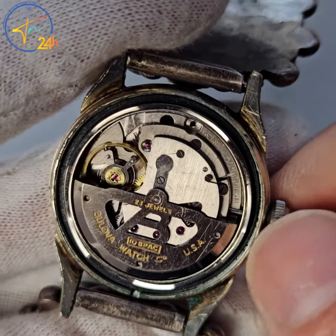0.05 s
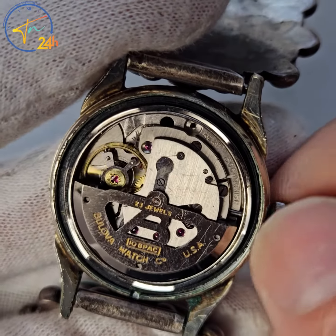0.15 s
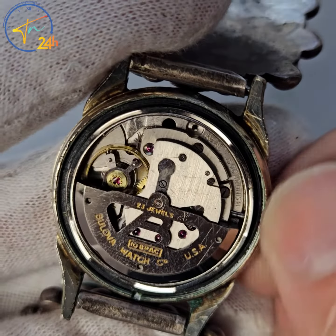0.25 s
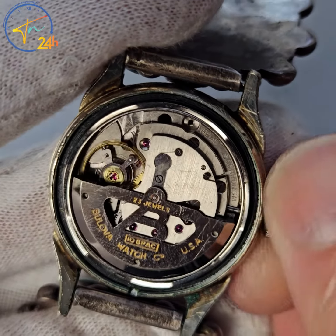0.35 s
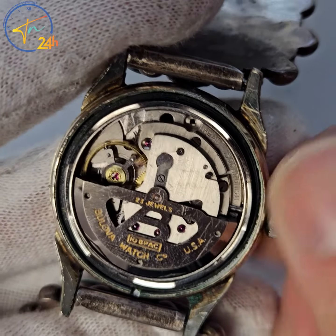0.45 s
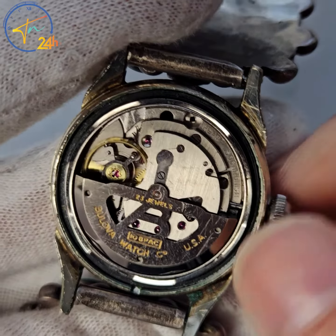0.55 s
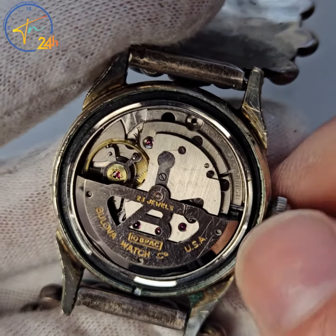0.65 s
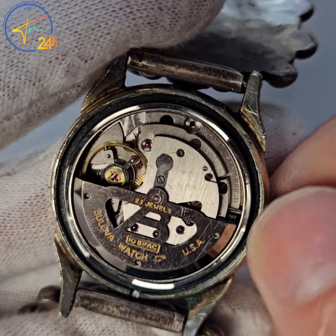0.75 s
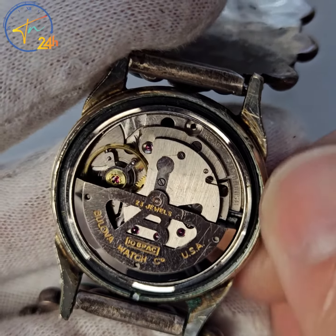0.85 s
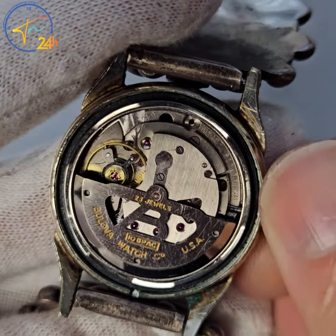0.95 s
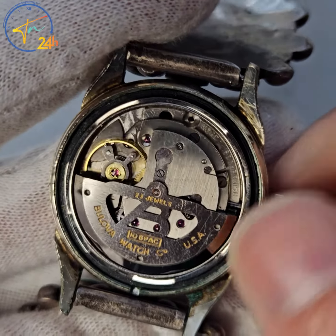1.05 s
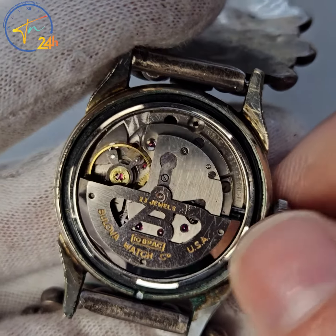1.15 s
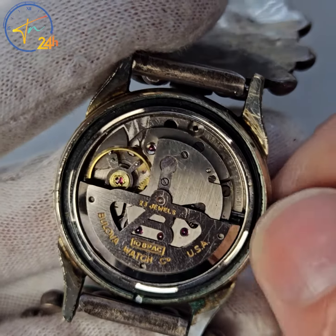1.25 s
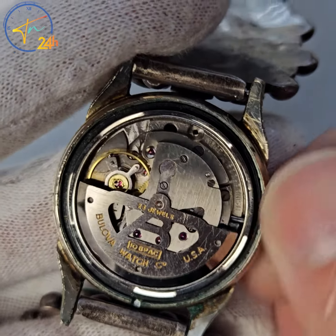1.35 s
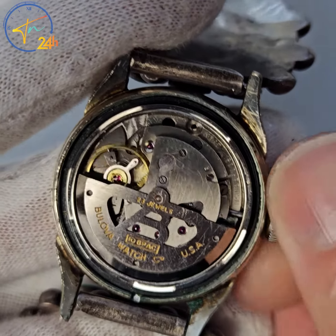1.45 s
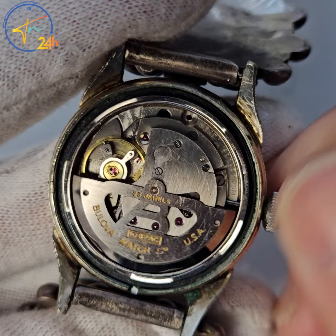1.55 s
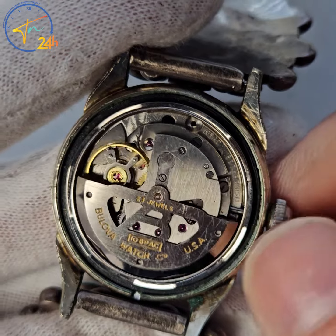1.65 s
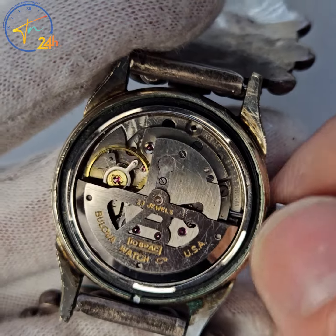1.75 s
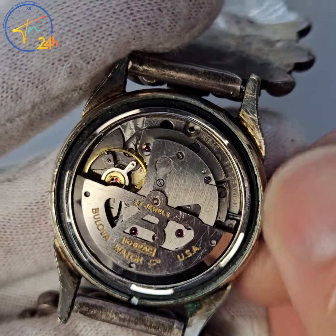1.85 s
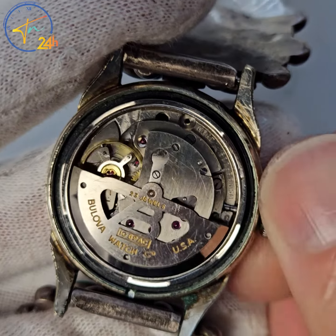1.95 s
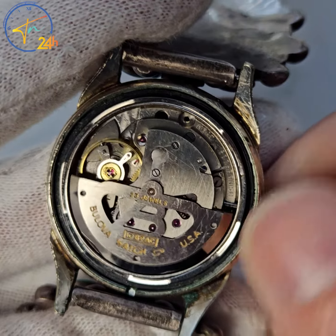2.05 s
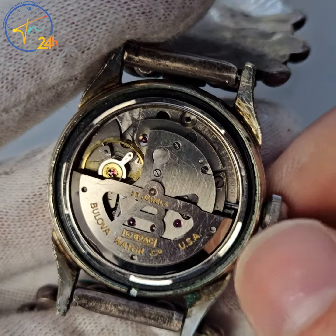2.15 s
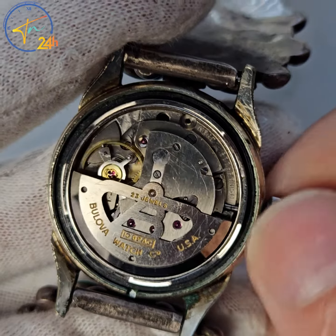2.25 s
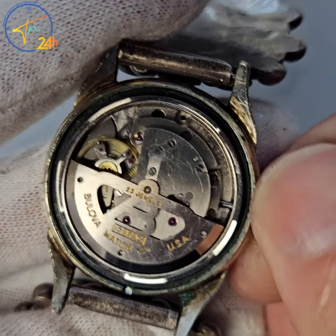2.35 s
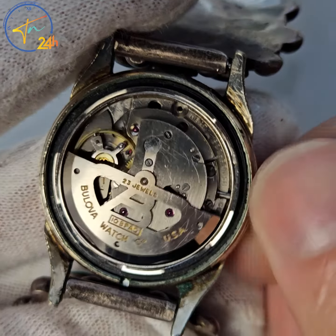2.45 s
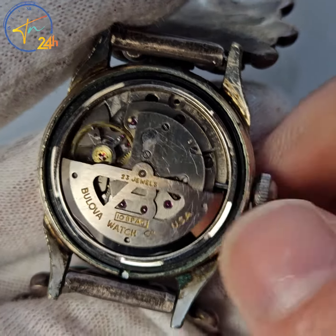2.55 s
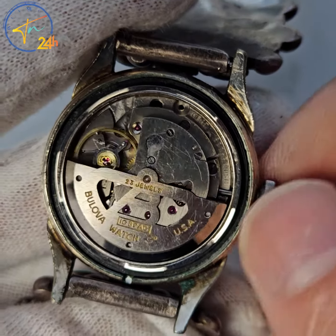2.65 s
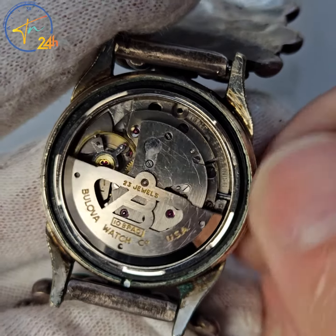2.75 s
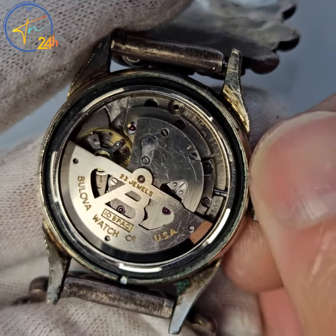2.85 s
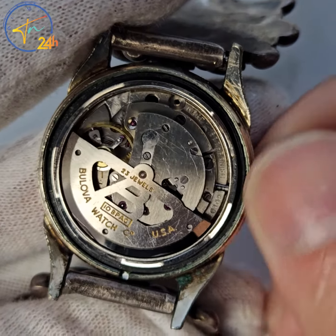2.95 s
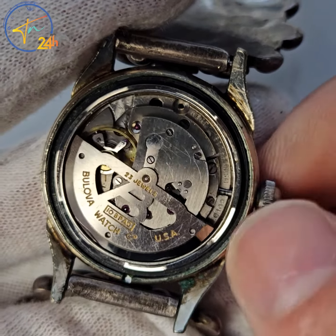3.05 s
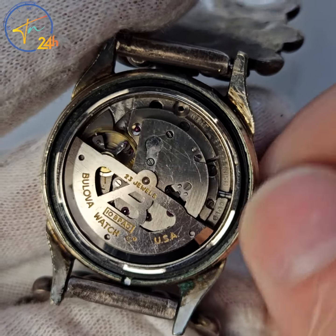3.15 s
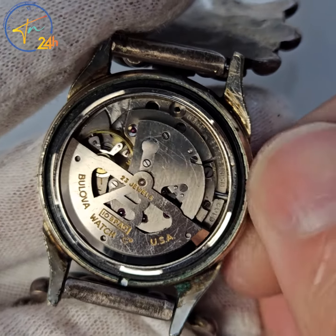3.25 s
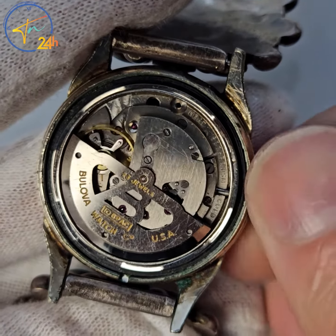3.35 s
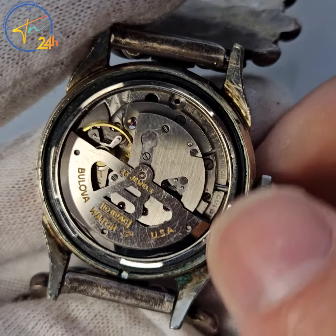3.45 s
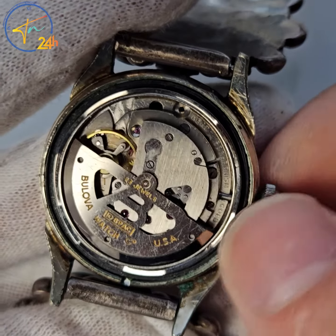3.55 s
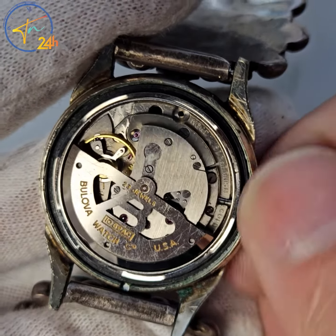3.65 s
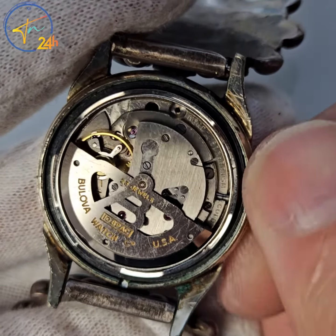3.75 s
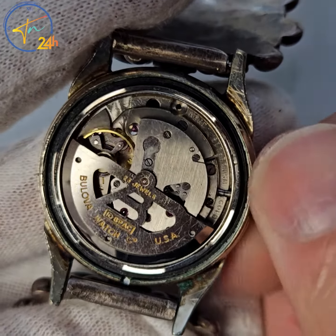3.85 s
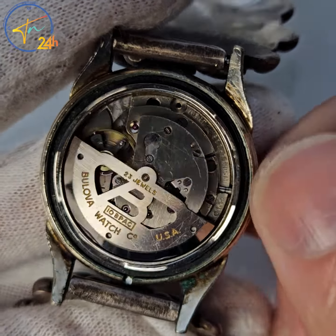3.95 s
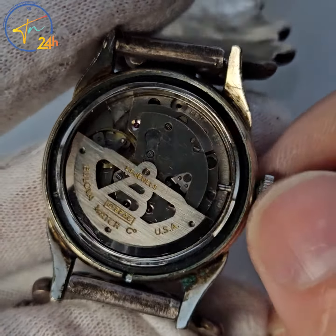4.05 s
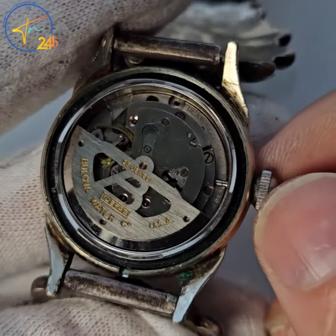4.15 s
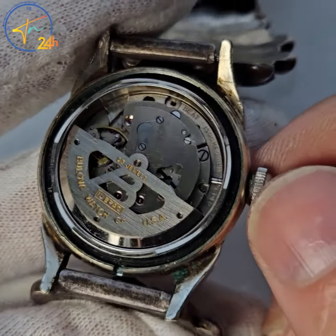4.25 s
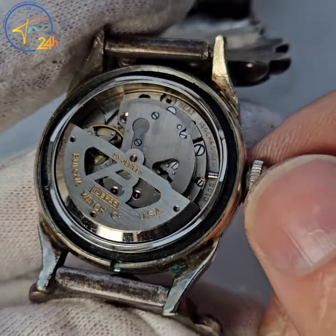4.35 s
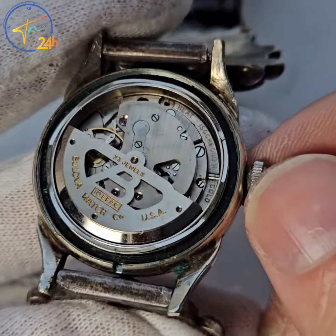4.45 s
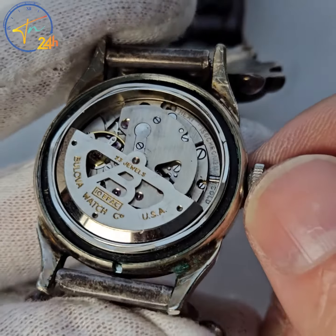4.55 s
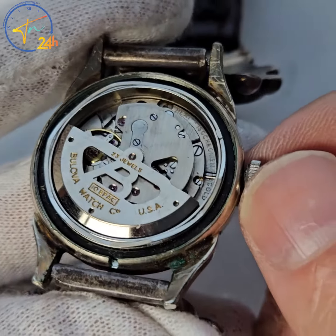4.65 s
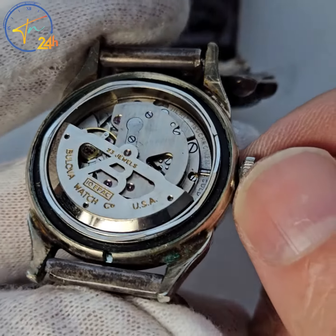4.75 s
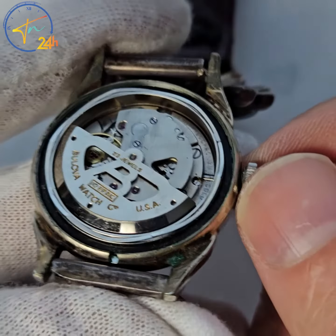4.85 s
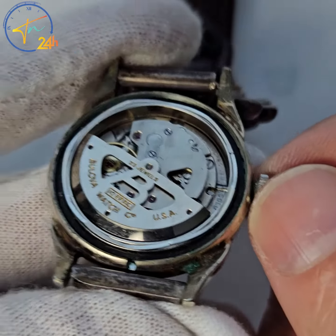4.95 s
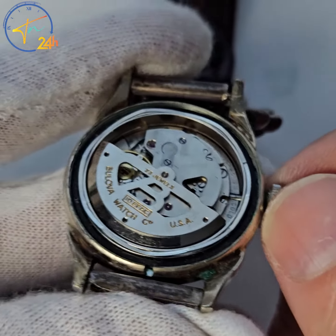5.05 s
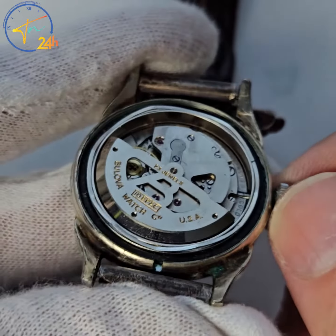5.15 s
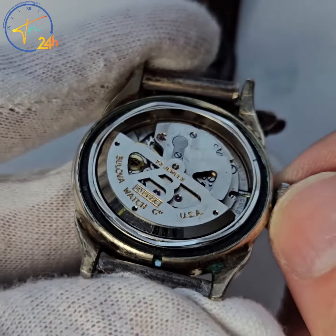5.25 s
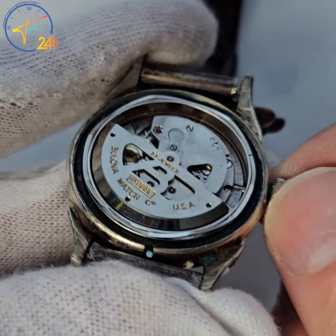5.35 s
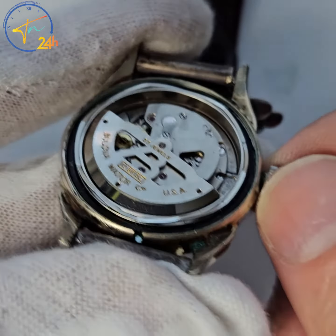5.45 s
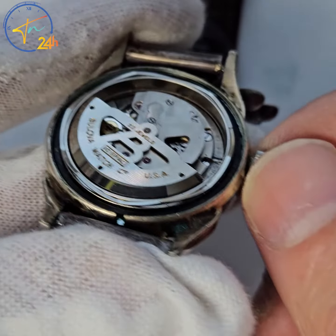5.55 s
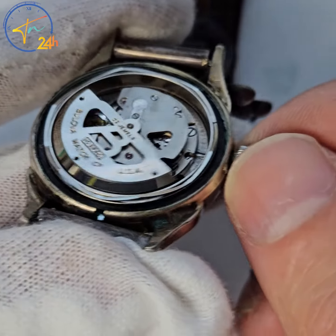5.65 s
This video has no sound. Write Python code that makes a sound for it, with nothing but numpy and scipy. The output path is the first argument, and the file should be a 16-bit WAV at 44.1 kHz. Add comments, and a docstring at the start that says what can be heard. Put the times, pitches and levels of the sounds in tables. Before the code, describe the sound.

Very close stereo sound of a wristwatch being wound in a small room. A tiny steel clack at 0.02 s opens, then a fine, bright gear rasp runs from 0.1 to 0.32 s, accelerating into a thin buzzing whine and slowing. Seven more flicks follow, starting near 0.7, 1.2, 1.7, 2.2, 2.65, 3.1 and 3.6 s, each 0.15 to 0.2 s long, gradually higher in pitch. Sharp light clacks precede most flicks, strongest around 2.2 s; small ticks and soft brushes fall between, with a clear bright tick at 2.42 s. The last rasp ends by 3.75 s. Small metallic fitting knocks come around 3.95 to 4.13 s, the clearest at 4.12. Then it is almost quiet until 5.7 s: barely audible ticking ten times a second, faint knocks, muffled low bumps near 4.7, 4.9 and 5.35 s, over soft low rumble and faint hiss.

```python
"""A wristwatch is wound by its crown in eight quick flicks, close to a stereo microphone in a small room.
Clacks sound as the stem takes up its play: damped modes of the stem ring with bursts of noise.
In each flick the gears rasp, noise pulsed tooth by tooth, and sing harmonics of the tooth rate where fastest.
Light ticks, knocks and brushes are noise bursts and resonances as the fingers let go and shift.
The movement ticks faintly, and a low rumble of filtered noise lies behind with a faint hiss."""
import sys
import numpy as np
from scipy import signal
from scipy.fft import rfft, irfft, next_fast_len
from scipy.io import wavfile
from scipy.ndimage import uniform_filter1d, map_coordinates

SR = 44100
rng = np.random.default_rng(int(sys.argv[2]) if len(sys.argv) > 2 else 0)


def store_pcm(level_fs):
    """Save levels as 16-bit WAV."""
    pcm = np.round(np.clip(level_fs, -1, 1) * 32767).astype(np.int16)
    wavfile.write(sys.argv[1], SR, np.atleast_2d(pcm).T)


N = 251811
TIME = np.arange(N) / SR

# Spectrum of light steel contact. Each row: frequency in hertz, relative density in dB per hertz.
CONTACT_COLOUR = [(900, -33.5), (2100, 5), (3500, 6.5), (4500, -13.5), (5500, -1.5), (6900, 0.5), (9000, 5),
                  (13000, 12.5), (16000, 3.5)]
# The watch as the two microphone ports hear it. Each row: frequency in hertz, left-right level in dB,
# left phase lead in radians, likeness (coherence) of the ports from 0 to 1.
PORTS = [(1000, 0, .5, .3), (1450, 5, 1, .6), (2050, 6, 1.9, .8), (2400, 3, 2.2, .88), (2580, 0, 2.85, .98),
         (2700, 0, 3.14, .999), (2920, 0, 3.22, .997), (3270, 4.5, 3.95, .75), (3600, 0, 3.2, .94),
         (4000, -2, 3.9, .85), (4300, 0, 5.9, .8), (4700, 6, 5.4, .8), (5000, 4, 5.25, .75),
         (5200, -1, 6.3, .75), (5550, 4, 7.7, .7), (5900, 9, 6.3, .6), (7500, 10, 8, .25), (8100, 9, 6, .4),
         (8400, 0, 6.3, .85), (9500, 2, 8, .4), (10500, 6, 9.9, .55), (11400, 4, 10.3, .4),
         (11900, -1, 10.9, .6), (12500, 2, 11.7, .7), (13700, 3, 12.6, .3), (15500, 2, 12.9, .35)]


def amp(db):
    """Logarithmic level: decibels become an amplitude gain."""
    return 10 ** (np.asarray(db) / 20)


def unit(x):
    """Mean power: x is scaled to rms 1."""
    return x / np.sqrt(np.mean(x ** 2) + 1e-20)


def along(points, hz, axis=1):
    """Logarithmic pitch: one column of a table is interpolated over log frequency."""
    table = np.transpose(points)
    return np.interp(np.log(hz + 1), np.log(table[0] + 1), table[axis])


def wobble(rate):
    """Random modulation: a smooth curve through random knots, rate of them a second."""
    knots = rng.standard_normal(int(N * rate / SR) + 4)
    return map_coordinates(knots, [TIME * rate])


def filtered(x, response):
    """Linear filtering: the spectrum of x is multiplied by a complex response of frequency."""
    size = next_fast_len(x.shape[-1] + 8192)
    hz = np.fft.rfftfreq(size, 1 / SR)
    return irfft(rfft(x, size) * response(hz), size)[..., :x.shape[-1]]


def coloured(x, spectrum):
    """Spectral shaping: x takes on a tabled spectrum, at rms 1."""
    return unit(filtered(x, lambda hz: amp(along(spectrum, hz))))


def shelved(x, treble_db):
    """Shelving filter: the range above about 7 kHz is raised or lowered, at rms 1."""
    return unit(filtered(x, lambda hz: amp(treble_db / (1 + (7000 / (hz + 1)) ** 6))))


def resonance(hz, centre_hz, width_hz):
    """Damped resonance: the response of one mode, 1 at its centre."""
    return 1j * hz * width_hz / (centre_hz ** 2 - hz ** 2 + 1j * hz * width_hz)


def causal(gain):
    """Minimum phase: the cepstrum is folded so a response rings only after its cause, at mean power 1."""
    cepstrum = irfft(np.log(unit(gain)))
    half = len(cepstrum) // 2
    fold = np.r_[1, np.full(half - 1, 2), 1, np.zeros(half - 1)]
    return np.exp(rfft(cepstrum * fold))


def shifting(x, depth_db, width_hz, hold_s):
    """Time-varying filtering: narrow peaks and hollows drift at random through x."""
    hz, t, z = signal.stft(x, SR, nperseg=512)
    grid = np.meshgrid(hz / width_hz, t / hold_s, indexing="ij")
    field = map_coordinates(rng.standard_normal(z.shape[1:]), grid)
    return signal.istft(z * unit(amp(depth_db * field)), SR, nperseg=512)[1][:, :N]


def panned(x, db):
    """Level stereo: the left is made louder than the right by db."""
    return x * amp([[db / 2], [-db / 2]])


def spread(pair):
    """Partial coherence: two unrelated signals become a partly alike left and right."""
    def mixing(hz):
        turn = np.arccos(np.clip(along(PORTS, hz, axis=3), 0, 1)) / 2
        return np.array([np.cos(turn), np.sin(turn)])
    shared, apart = filtered(pair, mixing)
    return np.array([shared + apart, shared - apart])


def add(track, s, sound):
    """Superposition: a short sound joins a track at s seconds, or at zero if s is negative."""
    part = track[..., max(round(s * SR), 0):][..., :sound.shape[-1]]
    part += sound[..., :part.shape[-1]]


def low_noise(spectrum, apart_db, steadiness):
    """Mid-side noise: a shared part with its slow swells partly evened out, and a weaker opposed part."""
    mid, side = coloured(rng.standard_normal((2, N)), spectrum)
    swell = abs(uniform_filter1d(mid ** 2, size=SR // 12)) + 1e-6
    mid = unit(mid / swell ** (steadiness / 2))
    side = amp(apart_db) * side
    return np.array([mid + side, mid - side])


def rumble_levels():
    """Addition of powers: each bump of the hands swells over the steady level of the three low bands."""
    # Steady level. Each row: time in seconds, thudding in dB, drone in dB, body in dB.
    steady_rows = [(0, -89.5, -64.5, -63), (0.26, -76, -65, -65), (0.34, -79, -55.5, -67),
                   (1.7, -66, -58.5, -61.5), (2.202, -74.5, -60, -64), (2.55, -71, -69, -67.5),
                   (3.149, -64.5, -64, -59), (3.65, -73.5, -65, -64.5), (3.999, -78, -65, -59.5),
                   (4.25, -67, -57, -64.5), (5.7, -65, -60, -62.5)]
    # Hands take hold and let go. Each row: time in seconds, swell length (centre to 1/e) in seconds,
    # thudding in dB, drone in dB.
    bumps = [(0.38, 0.034, -88, -51), (1.052, 0.073, -84, -54), (1.362, 0.03, -59.5, -59),
             (1.824, 0.043, -62.5, -53), (2.374, 0.052, -84.5, -52), (2.664, 0.058, -60, -54.5),
             (2.837, 0.077, -62, -53), (2.918, 0.017, -58, -67), (3.092, 0.054, -72.5, -46),
             (3.249, 0.036, -56, -49), (3.316, 0.031, -55.5, -59), (3.515, 0.047, -62, -50),
             (3.769, 0.034, -57.5, -52.5), (3.866, 0.018, -58.5, -52), (4.669, 0.041, -53, -68),
             (4.901, 0.033, -54, -60.5), (5.35, 0.023, -49, -53.5)]
    body_share_db = -14  # a bump in the body band, against the drone
    s, *columns = np.transpose(steady_rows)
    steady = amp([np.interp(TIME, s, column) for column in columns])
    swells = 0
    for at, length, thud_db, drone_db in bumps:
        bump = np.exp(-((TIME - at) / length) ** 2)
        swells = swells + amp([[thud_db], [drone_db], [drone_db + body_share_db]]) * bump
    return np.hypot(steady, swells)


def background():
    """Band-limited noise: soft thudding, a wavering drone and a dull rush, with faint hiss."""
    # Spectra of the four layers. Each row: frequency in hertz, relative density in dB per hertz.
    thud_colour = [(20, -31), (40, -20.5), (58, -2), (75, 1.5), (92, 3), (115, -22), (200, -82.5)]
    drone_colour = [(70, -51.5), (102, -5.5), (123, 14.5), (140, 8.5), (170, -1), (230, -55)]
    body_colour = [(120, -19.5), (180, 0), (218, 1.5), (260, -2), (310, -1), (400, -11.5), (500, -22),
                   (640, -31), (1000, -43.5), (2000, -56)]
    hiss_colour = [(500, -2), (750, 6), (950, -0.5), (1200, 5), (1600, -5.5), (2100, -0.5), (2500, -5.5),
                   (4500, -6), (6000, -13), (10000, -14.5), (12500, -17.5), (13500, -29.5), (16000, -45)]
    thud_gain, drone_gain, body_gain = rumble_levels()
    thud = thud_gain * panned(low_noise(thud_colour, apart_db=-21.5, steadiness=0.79), -9.0)
    drone = panned(low_noise(drone_colour, apart_db=-18.0, steadiness=0.16), -3.5)
    drone = drone_gain * amp(2.2 * wobble(21)) * drone
    body = body_gain * panned(low_noise(body_colour, apart_db=-7.5, steadiness=0.13), -0.76)
    hiss = coloured(rng.standard_normal((2, N)), hiss_colour)
    hiss = amp(-84.5) * shifting(hiss, depth_db=3, width_hz=70, hold_s=.09)
    return thud + drone + body + hiss


def clacks(crack_t60=0.0016, chatter_db=-26, chatter_s=0.0083, chatter_grows=0.16,
           lead_in_db=-31, lead_in_s=0.0066):
    """Impact excitation: a faint swell of noise leads into each strike, which rings modes and chatters; the
    first strike's swell, moved to zero, peaks just after it."""
    # The stem takes up its play. Each row: time in seconds, relative level in dB, overtones in dB.
    strikes = [(0.022, -24, -6.5), (0.659, -25.5, -7.5), (1.081, -30.5, -27.5), (1.183, -30, -13.5),
               (1.699, -26.5, -19), (2.0833, -31, -34), (2.1972, -20.5, -16), (2.2035, -27.5, -16.5),
               (2.6418, -23, -8), (3.0941, -23.5, -6.5), (3.5511, -22.5, -12.5)]
    # Nominal modes of the stem in the case. Each row: frequency in hertz, level in dB, 60 dB decay in seconds.
    stem_modes = [(2250, 0, .011), (2560, -1, .008), (3080, -5, .006), (3850, -9, .005), (4520, -5, .012),
                  (4850, -10, .009), (5650, -13, .005), (7400, -20, .005), (10200, -15, .004),
                  (12600, -8, .003)]
    pan_db = 4.5
    out, t = np.zeros((2, N)), np.arange(SR // 20) / SR
    for s, db, overtone_db in strikes:
        snap_db = 2 + 0.42 * overtone_db  # a harder clack has more snap, in step with its overtones
        # every strike excites the modes a little differently
        modes = np.array(stem_modes) * rng.normal(1, [.02, .15, .15], (len(stem_modes), 3))
        rings = []
        for k, (hz, level, t60) in enumerate(modes):
            decay = amp(level + rng.normal(0, 2) - 60 * t / t60)
            rings.append((-1) ** k * decay * np.sin(2 * np.pi * hz * t))
        # a soft contact rings mainly the lowest pair of modes
        ring = sum(rings[:2]) + amp(overtone_db + 10.5) * sum(rings[2:])
        crack, chatter, lead_in = coloured(rng.standard_normal((3, 2, len(t))), CONTACT_COLOUR)
        lead_in = shelved(lead_in, snap_db - 16.5) * np.exp(-t[::-1] / lead_in_s)  # grows to its end
        add(out, s - t[-1], amp(db + lead_in_db) * panned(lead_in, pan_db))
        crack = amp(snap_db) * crack * amp(-60 * t / crack_t60)
        add(out, s, amp(db - 8.5) * panned(ring + crack, pan_db))
        chatter = shelved(chatter, snap_db - 15) * np.exp(-t / chatter_s)
        add(out, s, amp(db + chatter_db + chatter_grows * overtone_db) * panned(chatter, pan_db))
    # so small a body radiates no bass
    return signal.sosfilt(signal.butter(5, 1700, "high", fs=SR, output="sos"), out)


def escapement(first_s=0.068, tick_db=-71.5):
    """Periodic impulses: the running movement ticks softly, strong and weak beats in turn, at uneven levels."""
    # Spectrum of a beat. Each row: frequency in hertz, relative density in dB per hertz.
    beat_colour = [(2500, -26), (4400, -12), (6000, -14), (7300, -5), (8300, -10), (9700, 2), (10800, -10),
                   (12200, -6), (13500, -26)]
    beats = 10 * (TIME - first_s)  # ten beats a second
    age = beats % 1 / 10  # seconds since the last beat
    accent_db = 3.5 * (np.floor(beats) % 2) - 1 + 2.5 * wobble(10)
    strike = amp(accent_db - 60 * age / .075) * (1 - np.exp(-age / .007)) ** 2
    return amp(tick_db) * strike * panned(coloured(rng.standard_normal((2, N)), beat_colour), 4.1)


def snags():
    """Stick and slip: single teeth catch and snap free, each a sudden force that dies away."""
    # Mostly as a flick starts or ends. Each row: time in seconds, force in dB.
    catches = [(0.0841, -38.5), (0.0887, -39), (0.2934, -35), (0.3154, -45), (0.696, -36.5),
               (1.2161, -37.5), (1.731, -38.5), (1.8714, -36), (1.8874, -41.5), (2.8095, -34.5),
               (3.2164, -35.5), (3.2485, -32.5), (3.7164, -31.5)]
    out, t = np.zeros(N), np.arange(SR // 100) / SR
    for s, db in catches:
        add(out, s, amp(db) * np.exp(-t / .0008))
    return out


def crown_motion():
    """Kinematics of a flick: it speeds up, peaks and slows, setting tooth rate, singing and loudness."""
    # Flicks of the crown. Each row: start, fastest moment and end in seconds, relative level in dB,
    # top tooth rate in hertz, speeding up and slowing down in seconds, relative singing in dB, drag from 0 to 1.
    flicks = [(0.095, 0.209, 0.318, -34.5, 2027, 0.052, 0.065, -7, 0.27),
              (0.686, 0.81, 0.87, -34, 2495, 0.055, 0.046, -4, 0.2),
              (1.217, 1.337, 1.39, -33.5, 2608, 0.056, 0.039, -3, 0.07),
              (1.731, 1.812, 1.884, -34, 2746, 0.05, 0.046, -3.5, 0.02),
              (2.217, 2.281, 2.365, -33.5, 2682, 0.042, 0.043, -2, 0.01),
              (2.653, 2.731, 2.816, -33, 2689, .06, .037, -2.5, 0.12),
              (3.114, 3.174, 3.258, -33, 3000, 0.044, 0.044, -6, 0.1),
              (3.571, 3.617, 3.744, -33.5, 3160, 0.027, 0.03, -9.5, 0.45)]
    grip_s, release_s = .008, .0045  # the fingers take hold of the crown; the wheels stop
    ease_db_per_s = 10  # finger pressure eases off through a flick
    drag_speed = .25  # share of top speed that a fully dragging finger keeps up
    rows = np.array(flicks)
    nearest = np.argmin(abs(TIME[:, None] - rows[:, 1]), axis=1)
    start, fastest, end, db, top_hz, rise, fall, sing_db, drag = rows[nearest].T
    late = TIME - fastest
    speed = 1 / (1 + (late / np.where(late < 0, rise, fall)) ** 2)
    held = np.clip(.5 + (TIME - start) / grip_s, 0, 1)
    held = held * np.exp(-np.maximum(TIME - end, 0) / release_s)
    # loudness follows speed, over a share of drag that rasps at any speed
    level = amp(db - ease_db_per_s * late) * held * (drag + (1 - drag) * speed)
    rate_hz = top_hz * (speed + drag_speed * drag * (1 - speed))
    return rate_hz, speed, sing_db, level


def tooth_count(rate_hz, jitter):
    """Phase as the integral of frequency: teeth passed so far, their uneven spacing wavering the rate."""
    uneven = 1 + jitter * wobble(900) + 0.0083 * wobble(110)
    return np.cumsum(abs(rate_hz * uneven)) / SR


def ratchet(passed, rate_hz, scatter_db, rub_db):
    """Pulsed contact force near rms 1: decaying tooth bursts, separate when slow and merging when fast."""
    tooth = passed.astype(int)
    size = amp(scatter_db * rng.standard_normal(N))[tooth]
    since_s = (passed - tooth) / rate_hz
    force = size * np.exp(-since_s / .00045) + amp(rub_db)
    return force / np.sqrt(abs(uniform_filter1d(force ** 2, size=SR // 80)))


def rasp(force):
    """Friction noise: each push scrapes steel on steel and sounds through the case."""
    # Gears heard through the open case. Each row: frequency in hertz, relative density in dB per hertz.
    case_colour = [(900, -40.5), (1400, -29.5), (1750, -23), (2050, -7.5), (2400, -3.5), (2700, -7),
                   (3000, 0), (3250, 2), (3520, -6), (3800, -0.5), (4150, 4.5), (4550, -3), (4950, 0),
                   (5400, -1.5), (6100, 0.5), (6500, -12), (6850, -18.5), (7350, -7), (8500, -5),
                   (8850, -6), (10200, -2.5), (11300, -4), (11800, 3), (12200, 1), (13000, 3),
                   (13450, -1.5), (14300, 2.5), (15000, 1.5), (15600, -1)]
    scrape = spread(force * rng.standard_normal((2, N)))
    return filtered(scrape, lambda hz: causal(amp(along(case_colour, hz))))


def teeth(passed, flutter_db, count=4):
    """Harmonic series: meshing teeth sing the multiples of their rate, each fluttering in level."""
    # Response to the singing teeth. Each row: frequency in hertz, gain in dB.
    sing_colour = [(900, -42), (1300, -30), (1600, -13), (2000, 0), (2400, 4), (3000, 6), (3500, -1),
                   (3900, 6), (4250, 6), (4550, 4), (5000, 7), (5400, 6.5), (6100, -1), (6800, -18),
                   (7500, -6), (8500, -7), (15000, -20)]
    tone = sum(amp(flutter_db * wobble(500)) * np.sin(2 * np.pi * k * passed) for k in range(1, count + 1))
    return filtered(unit(tone), lambda hz: amp(along(sing_colour, hz)))


def plates(x):
    """Sympathetic resonance: the plates and case ring on briefly at their own frequencies."""
    # Sharp resonances. Each row: frequency in hertz, width in hertz, boost in dB.
    plate_modes = [(2395, 45, 3), (4210, 60, 2), (4350, 50, 4), (5060, 70, 2), (5235, 70, 4), (5680, 50, 3),
                   (12600, 100, 3), (13055, 50, 4), (14333, 40, 6)]

    def response(hz):
        return 1 + sum((amp(db) - 1) * resonance(hz, mode, width) for mode, width, db in plate_modes)
    return filtered(x, response)


def winding():
    """Gear meshing: the train rasps tooth by tooth through a flick and sings where it runs fastest."""
    rate_hz, speed, sing_db, level = crown_motion()
    passed = tooth_count(rate_hz, jitter=.032)
    # the wheels bind and run free at random
    push = amp(0.3) * speed ** .13 * level * amp(0.7 * wobble(130))
    force = push * ratchet(passed, rate_hz, scatter_db=2, rub_db=-14)
    song = push * amp(sing_db - 3) * speed ** .6 * teeth(passed, flutter_db=4.5)
    # narrow peaks and hollows drift at random through the rasp and singing
    return plates(shifting(rasp(force + snags()) + song, depth_db=2, width_hz=130, hold_s=.1))


def ticks(t60=0.0081, ring_t60=0.0214, ring_db=-2, width_hz=450):
    """Burst and resonance: small steel parts touch, dull or bright, each with its own short rough ring."""
    # Parts settle, fingers touch the crown. Each row: time in seconds, relative level in dB,
    # ring frequency in hertz, relative treble in dB.
    touches = [(0.369, -42, 4160, 2.5), (0.412, -48, 5350, 1.5), (0.877, -41, 4250, -11.5),
               (0.936, -41, 5120, -4), (1.44, -42, 2300, -20), (1.448, -36, 4300, -11),
               (1.4647, -39.5, 4350, -26), (1.475, -41.5, 2275, -24), (1.4895, -40.5, 4260, -4.5),
               (1.938, -43.5, 5070, -2.5), (1.9639, -51.5, 2380, -24), (2.191, -41.5, 2400, -19),
               (2.419, -29, 5000, 3.5), (2.466, -35, 5160, -9), (2.492, -47.5, 3100, -18.5),
               (2.624, -41, 9850, -2.5), (3.0819, -45, 4490, -1), (3.321, -50.5, 4270, -15),
               (3.363, -53, 4360, -7), (3.5424, -38, 2240, -8.5), (3.81, -47, 4180, -12),
               (3.8435, -52.5, 3200, -30), (5.698, -45.5, 5400, -35)]
    out, t = np.zeros((2, N)), np.arange(SR // 20) / SR
    onset = 1 - np.exp(-t / .0004)
    for s, db, ring_hz, treble_db in touches:
        force = spread(rng.standard_normal((2, len(t))))
        burst = shelved(coloured(force, CONTACT_COLOUR), treble_db + 14.5) * amp(-60 * t / t60)
        ring = unit(filtered(force, lambda hz: resonance(hz, ring_hz, width_hz)))
        ring *= amp(ring_db - 60 * t / ring_t60) / (1 + amp(treble_db + 4.5))  # a bright tick rings less
        add(out, s, amp(db - 4.0) * panned(burst + ring, -0.5) * onset)
    return out


def brushes(uneven_db=3, focus_db=7, width_hz=900):
    """Sliding friction: soft uneven swells as the hands shift their hold, each with a broad resonance."""
    # Skin and glove brush the watch. Each row: middle in seconds, swell length (centre to 1/e) in seconds,
    # level in dB, treble in dB, resonance in hertz.
    strokes = [(0.396, 0.037, -69.5, 9, 4300), (1.476, 0.018, -60.5, 8, 1770),
               (2.461, 0.063, -70.5, 17, 4193), (2.928, 0.045, -71, 2, 4843), (3.922, 0.066, -76, 2, 4780),
               (4.11, 0.077, -80, -24, 2235), (4.58, 0.036, -78.5, 13, 4870),
               (4.925, 0.035, -83, -0.5, 5230)]
    # Spectrum of the brushing. Each row: frequency in hertz, relative density in dB per hertz.
    skin_colour = [(700, -30.5), (1400, -1.5), (2100, -1.5), (3100, 5.5), (3800, -3.5), (5200, -4),
                   (6800, -9.5), (12000, -10.5), (16000, -32.5)]
    out, t = np.zeros((2, N)), np.arange(SR // 4) / SR
    middle = t[-1] / 2
    for s, length, db, treble_db, centre_hz in strokes:
        friction = coloured(rng.standard_normal((2, len(t))), skin_colour)
        friction = filtered(friction, lambda hz: 1 + amp(focus_db) * resonance(hz, centre_hz, width_hz))
        swell = np.exp(-((t - middle) / length) ** 2)
        add(out, s - middle, amp(db) * shelved(friction, treble_db) * swell)
    return out * amp(uneven_db * wobble(100))


def knocks(focus_db=22, scuff_db=-8, scuff_t60=0.025):
    """Modal ringing: a tap and a brief scuff excite the fittings, most strongly near one pitch."""
    # The strap fittings shift in the gloved hand. Each row: time in seconds, peak in dB, strongest hertz.
    shifts = [(3.018, -62.5, 2200), (3.95, -60.5, 2900), (4.051, -66, 2300), (4.09, -62, 1900),
              (4.094, -66, 2650), (4.125, -52, 2990), (4.1238, -60.5, 8000), (4.289, -79, 2050),
              (4.68, -78, 2100), (4.906, -69, 5230), (5.095, -70, 4420), (5.274, -73.5, 2090),
              (5.48, -76, 4450)]
    # Modes of those fittings. Each row: frequency in hertz, level in dB, 60 dB decay in seconds.
    fitting_modes = [(1850, -4, .05), (2000, -4, .07), (2240, 0, .05), (2650, -3, .035), (3110, 3, .06),
                     (4450, -4, .09), (5260, -3, .06), (5600, -5, .04), (6490, -3, .06)]
    out, t = np.zeros((2, N)), np.arange(SR // 8) / SR
    for s, db, centre_hz in shifts:
        ring = 0
        for k, (hz, level, t60) in enumerate(fitting_modes):
            mode_db = level - focus_db * abs(np.log2(hz / centre_hz))  # focus in dB per octave
            ring = ring + (-1) ** k * amp(mode_db - 60 * t / t60) * np.sin(2 * np.pi * hz * t)
        contact = (t == 0) + rng.standard_normal((2, len(t))) * amp(scuff_db - 60 * t / scuff_t60)
        knock = signal.fftconvolve(contact, ring[None], axes=1)
        add(out, s, amp(db) * knock / abs(knock).max())
    return out


def ports(x):
    """Stereo cues: the two ports differ in level and phase at each frequency."""
    def response(hz):
        gains = panned(1, along(PORTS, hz))[:, 0]
        lead = np.exp(.5j * along(PORTS, hz, axis=2))
        return gains / np.sqrt(np.mean(gains ** 2, axis=0)) * [lead, lead.conj()]
    return filtered(x, response)


def room(x):
    """Diffuse reverberation: convolution with decaying noise after 5 ms, shortest in the treble."""
    # Decay of the room. Each row: frequency in hertz, 60 dB decay in seconds.
    decay = [(500, .45), (3000, .5), (8000, .4), (15000, .3)]
    hz, t, z = signal.stft(rng.standard_normal((2, SR * 3 // 4)), SR, nperseg=256)
    tail = signal.istft(z * amp(-60 * t / along(decay, hz)[:, None]), SR, nperseg=256)[1]
    tail = np.pad(tail / np.linalg.norm(tail[0]), ((0, 0), (SR // 200, 0)))
    return signal.fftconvolve(x, tail, axes=1)[:, :N]


def scene():
    """Superposition of direct and diffuse sound: the watch close up, its room and the rumble."""
    # The hand shifts the watch a little between flicks. Each row: time in seconds, left-right level in dB.
    drift = [(0.2, 0.41), (1.8, 0.35), (2.3, 0.26), (2.75, -0.18), (3.2, -0.74), (3.7, -0.37)]
    lean = np.interp(TIME, *np.transpose(drift))
    inside = clacks() + winding() * amp([lean / 2, -lean / 2]) + ticks()
    watch = ports(inside) + escapement() + brushes() + knocks()
    return background() + watch + amp(-22.0) * room(watch)


def record(dry):
    """Band limiting: the recorder keeps almost nothing above 15760 Hz."""
    return filtered(dry, lambda hz: 1 / np.sqrt(1 + (hz / 15760) ** 400))


dry = scene()
out = record(dry)
store_pcm(out)
```